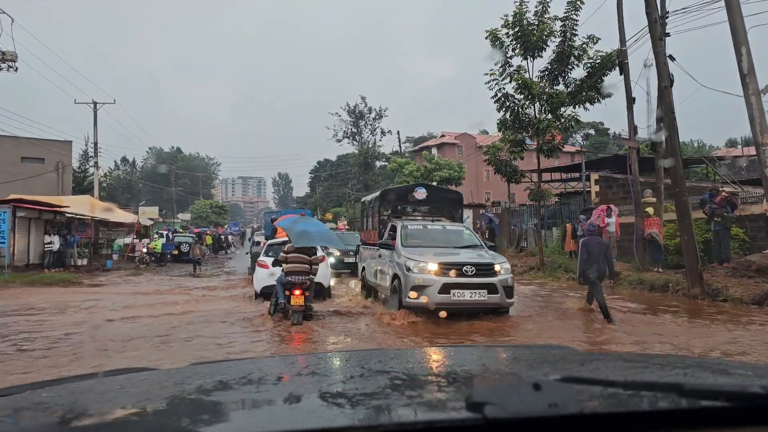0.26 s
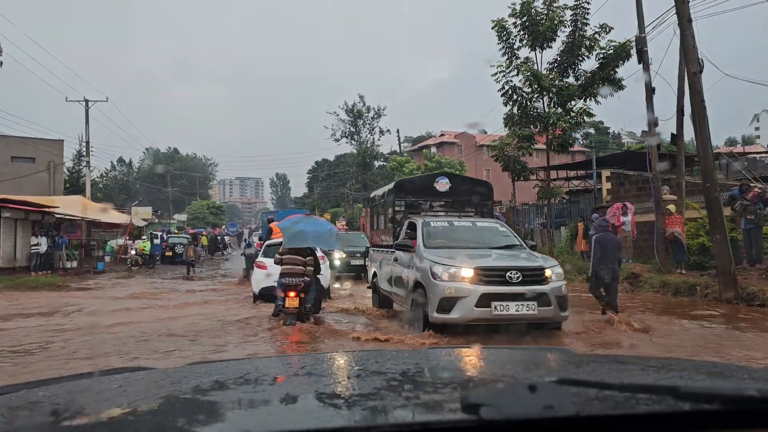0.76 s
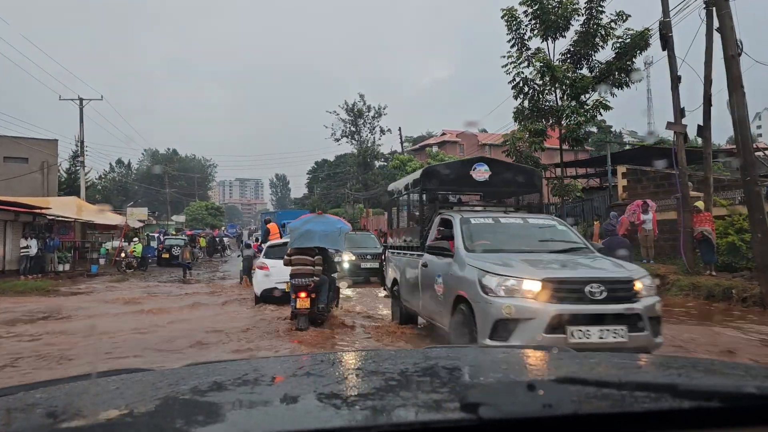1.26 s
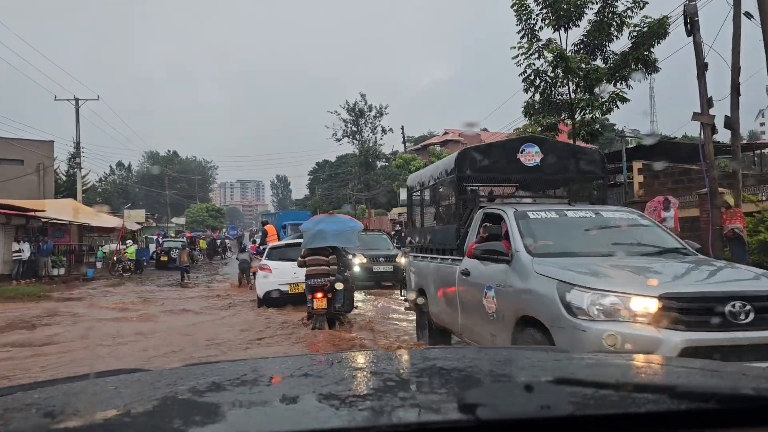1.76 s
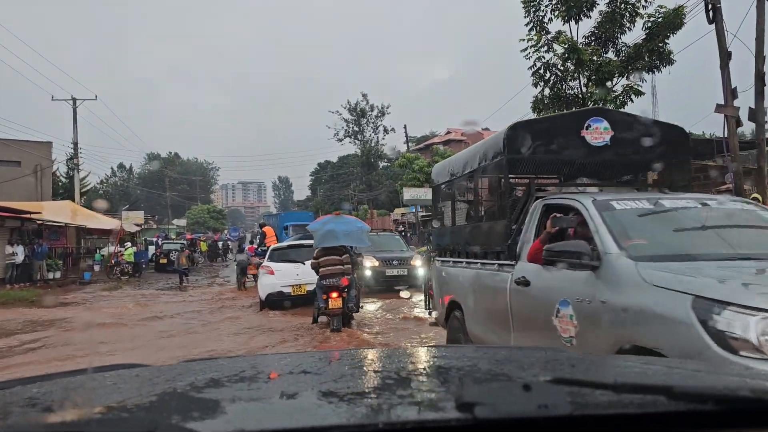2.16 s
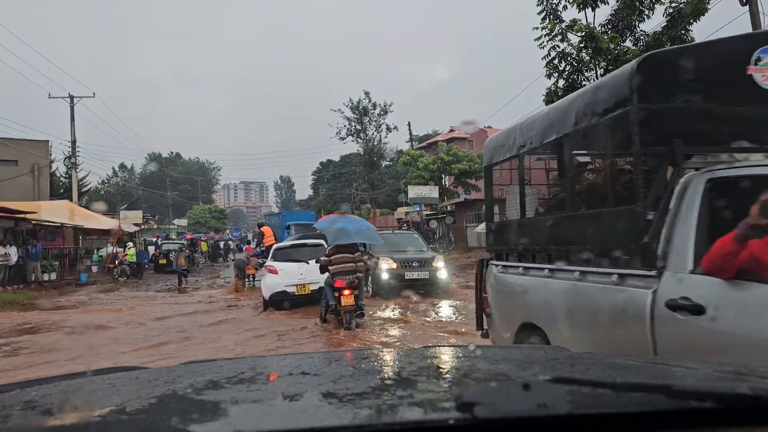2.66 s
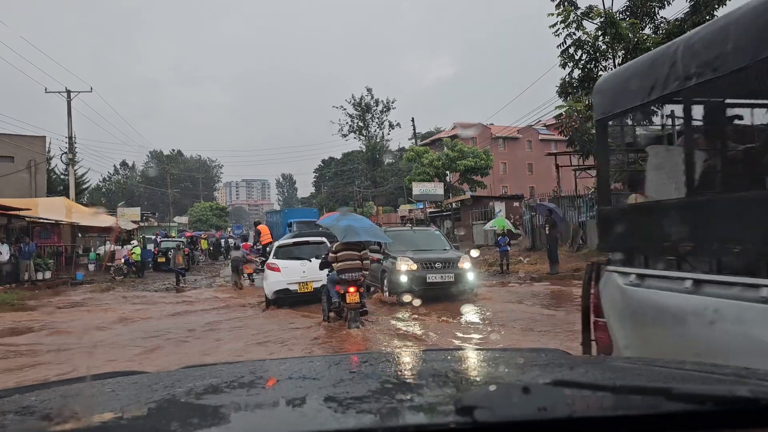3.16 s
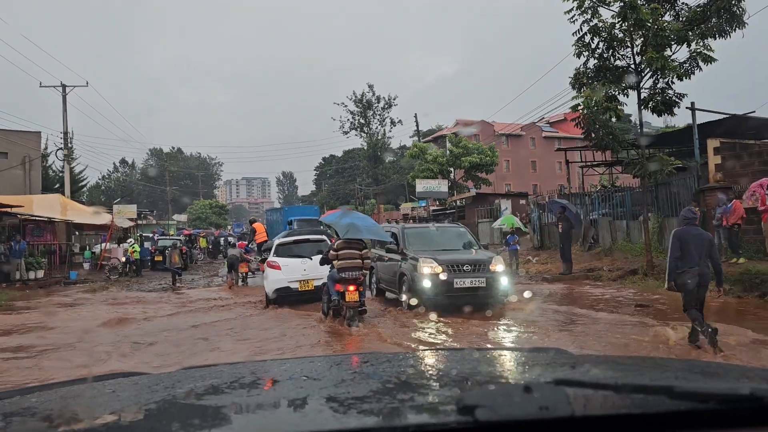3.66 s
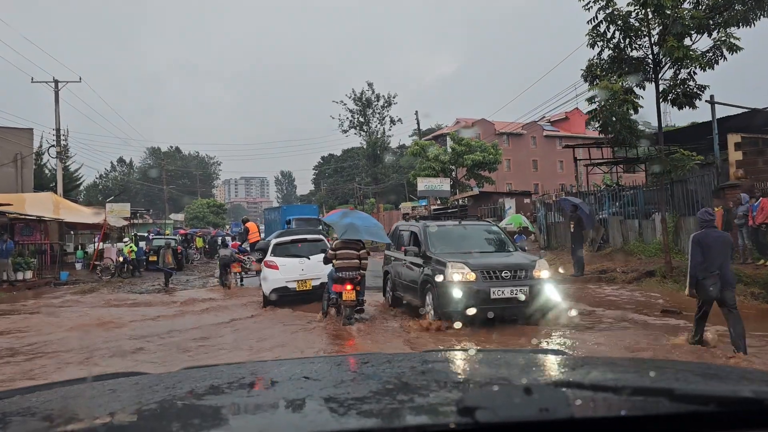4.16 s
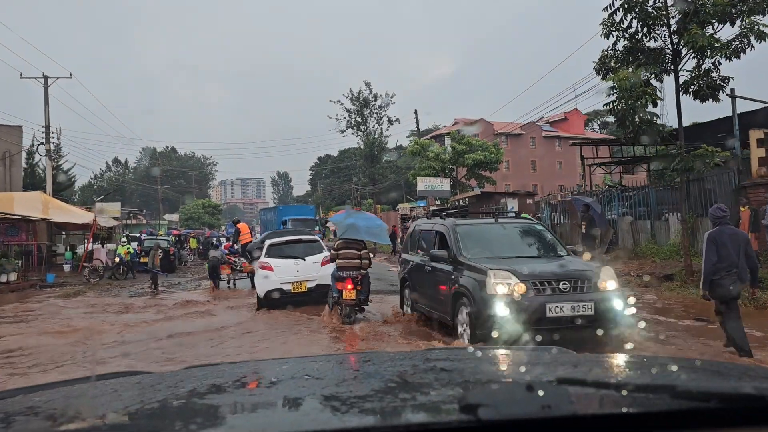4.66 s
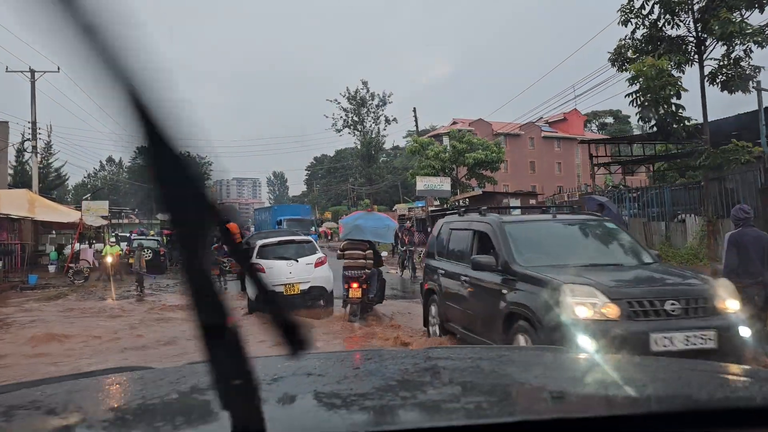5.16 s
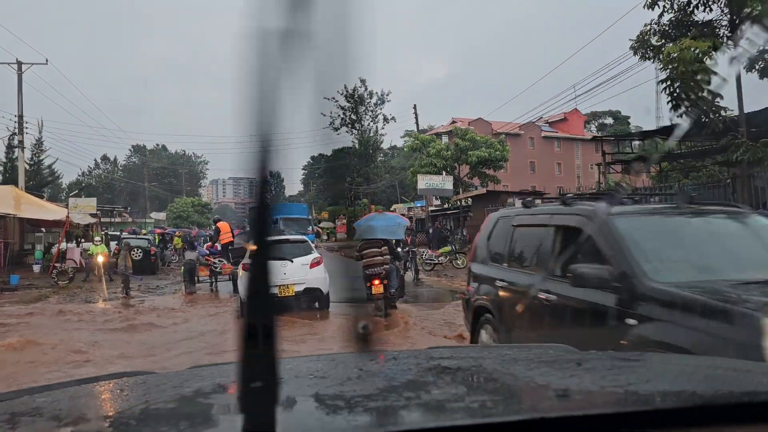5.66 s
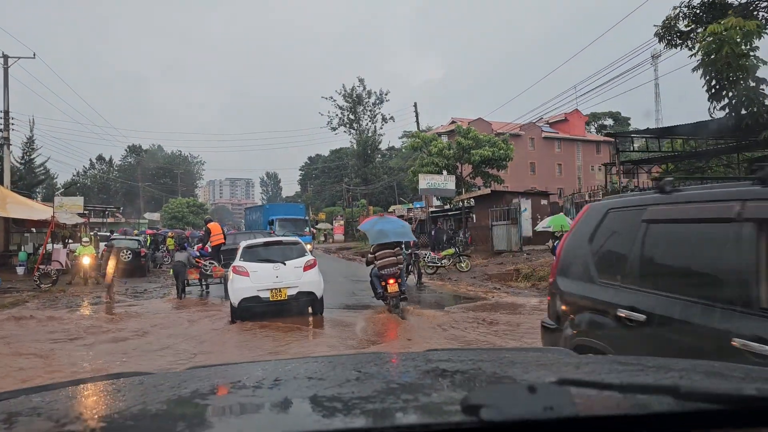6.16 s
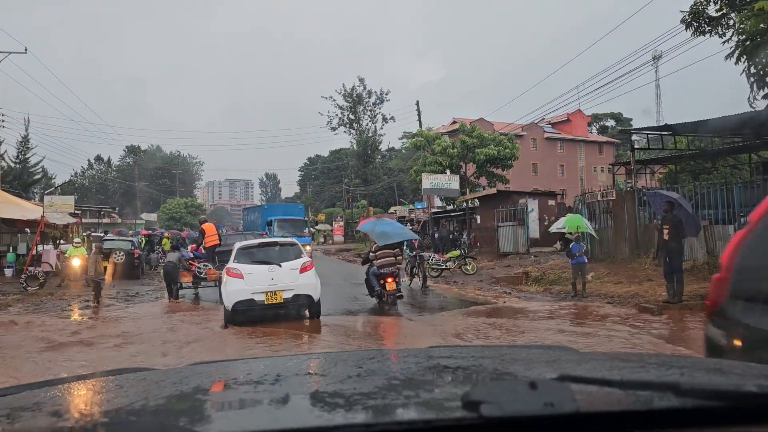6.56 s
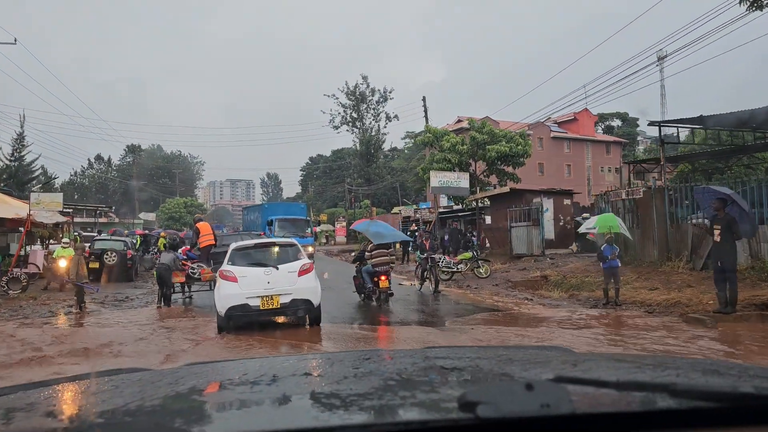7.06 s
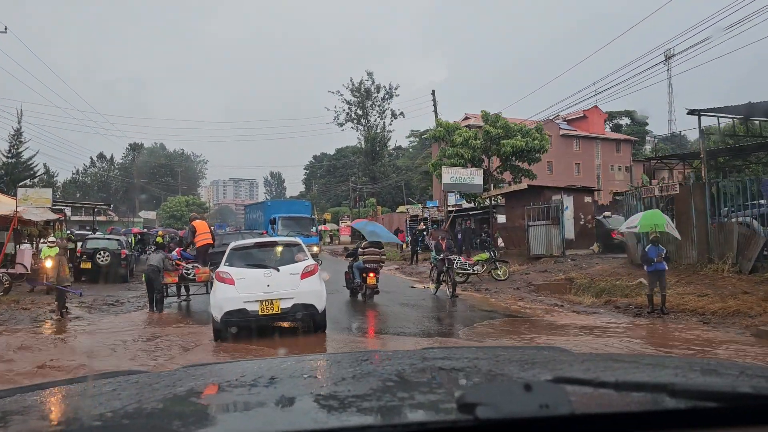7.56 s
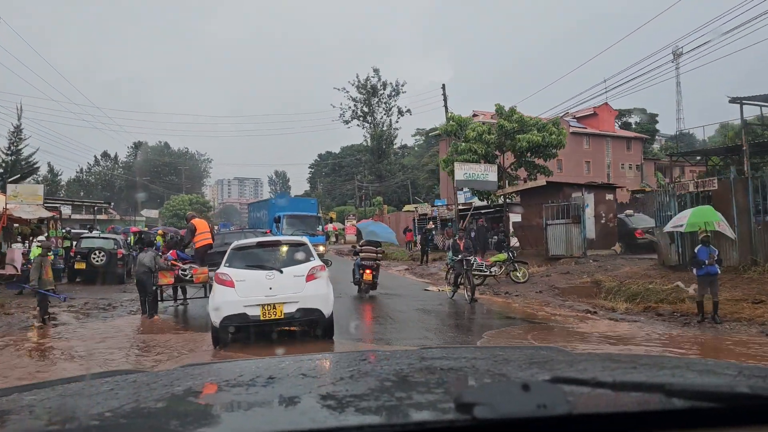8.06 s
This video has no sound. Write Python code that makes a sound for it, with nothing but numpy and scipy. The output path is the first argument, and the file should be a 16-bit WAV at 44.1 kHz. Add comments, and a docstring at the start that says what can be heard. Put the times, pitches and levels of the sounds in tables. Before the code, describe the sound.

From inside the cabin, a heavy car's engine idles with a deep boom and brief revs, over rumbling tyres and churning water. Fine drops tick on the glass at the right. Spray from two oncoming vehicles washes past, mostly on the right, around three and a half and again near seven seconds. Between them the wipers sweep once with dry knocks and a dull thud, then the engine revs hardest and settles.

```python
"""The engine of a heavy four-cylinder car booms in the cabin, idling and revving as it creeps through floodwater.
Firing orders make its note; shaped noise and ringing bubbles make the rumbling, churning wheels and watery swishes.
Droplet noise surges as spray, from the car's own wheels at first, then from two oncoming cars, over the drone of
vehicles ahead. Short rings tick on the glass as drops; the wipers make one sweep, with knocks and a thud made of
rings with rattle."""
import sys
import numpy as np
from scipy import signal
from scipy.fft import rfft, irfft, next_fast_len
from scipy.io import wavfile

SR = 44100
rng = np.random.default_rng(int(sys.argv[2]) if len(sys.argv) > 2 else 0)


def to_wav(sig):
    """Store sig (one row per channel, or 1-D mono) as 16-bit WAV at the path in sys.argv[1].

    Samples outside -1..1 are clipped; the rate is SR.
    """
    pcm = np.clip(np.atleast_2d(sig), -1, 1) * 32767
    pcm = np.round(pcm).astype(np.int16)
    wavfile.write(sys.argv[1], SR, pcm.T)  # frames by channels


N = 366823
TIME = np.arange(N) / SR

# how hard the car pushes through the water: time_s, push_db (below the hardest push)
PUSH = [(0, -8.5), (1.9, -6.5), (4.0, -7), (4.6, -4), (5.1, -3.5), (5.8, -4), (6.35, -3), (6.75, 0),
        (7.2, -1.5), (7.55, -4), (8.32, -5.5)]


def undb(db):
    """Decibels to gain."""
    return 10 ** (np.asarray(db) / 20)


def curves(table):
    """Each column of a table, joined by lines, for every sample."""
    s, *columns = np.transpose(table)
    return [np.interp(TIME, s, column) for column in columns]


def unit(x):
    """Scale to rms 1."""
    return x / np.sqrt(np.mean(x ** 2))


def pan(db):
    """Left and right gains for a level difference, left minus right."""
    return undb(np.array([[1], [-1]]) * db / 2)


def walk(rate):
    """Smooth random wander with a spread near 1, taking a new direction rate times a second."""
    knots = rng.standard_normal(1024)
    return 1.44 * np.interp(TIME * rate, np.arange(len(knots)), knots)


def bell(s, half):
    """A smooth rise and fall around a moment, down to 1/e at half seconds either side."""
    return np.exp(-((TIME - s) / half) ** 2)


def resonance(hz, modes):
    """Lift in dB that a set of resonances gives at a frequency."""
    return sum(db / (1 + (2 * (hz - centre) / width) ** 2) for centre, width, db in modes)


def colour(x, points, sides=None):
    """Shape a sound by a spectrum and by the resonances of glass and cabin, and lean it to one side."""
    # resonances of the glass and the cabin: centre_hz, width_hz, lift_db
    cabin = [(570.4, 9.2, 7.5), (784, 6.9, 7), (1156, 260, 3), (1351, 33, 8.5), (1562, 44, 5),
             (2074, 41, 6.5), (3055, 100, 5), (4770, 350, 0.5), (6340, 81, 5.5), (6870, 350, -2.5),
             (11700, 150, 5.5)]
    size = next_fast_len(N, True)
    f = np.fft.rfftfreq(size, 1 / SR)
    hz, db = np.transpose(points)
    spectrum_db = np.interp(np.log(f + 1), np.log(hz), db)
    gain = undb(spectrum_db + resonance(f, cabin))
    if sides is not None:
        gain = gain * pan(np.interp(f, *np.transpose(sides)))
    return irfft(rfft(x, size) * gain, size)[..., :N]


def spread(x, own):
    """From three unrelated sounds: the first reaches both sides, the others one side each."""
    own = np.clip(own, 0, 1)
    return np.sqrt(1 - own) * x[0] + np.sqrt(own) * x[1:]


def lift_level():
    """Dips in dB of the engine note while the driver eases off."""
    # moments of easing off: centre_s, depth_db, half_length_s
    lifts = [(0.42, -13, .1), (2.81, -9, .055), (2.96, -12, .04), (4.36, -4, .1), (4.84, -5, .06),
             (7.46, -12, .07)]
    return sum(db * bell(s, half) for s, db, half in lifts)


def engine(half_db=-25, half_db_per_octave=15, uneven_db=1.74):
    """Firings boom in the cabin; unequal cylinders add half orders, and each firing shakes out a dull clatter."""
    # engine speed: time_s, firing_hz
    speed = [(0.1, 32.76), (0.27, 38.2), (0.42, 47.67), (0.66, 46.86), (0.8, 39.34), (1.0, 37.84),
             (1.4, 35.01), (1.9, 33.19), (2.3, 34.56), (2.62, 34.35), (2.75, 39.16), (2.87, 46),
             (3.02, 35.05), (3.16, 31.94), (3.75, 33.28), (4.0, 37.07), (4.22, 38.59), (4.38, 53.22),
             (4.79, 50.15), (5.45, 49.89), (5.85, 38.3), (6.05, 48.5), (6.5, 50.06), (6.66, 62.24),
             (6.8, 69.05), (6.9, 71.1), (7.06, 67.6), (7.18, 62.2), (7.33, 50.98), (7.62, 36.21),
             (7.95, 33), (8.32, 32.98)]
    # firing note at the hardest push, most shaking at idle: firing_hz, level_db
    boom = [(33, -10.5), (36, -12.5), (38, -18), (42, -16), (51, -24), (70, -22)]
    # overtones: order (multiple of the firing rate), relative_db
    overtones = [(1.5,-11),(2,1.5),(2.5,-20),(3,-7),(3.5,-22),(4,-14),(4.5,-23),(5,-18),(6,-20),(7,-23),(8,-25)]
    # standing waves of the cabin air, with their nodes: centre_hz, width_hz, lift_db
    air_modes = [(76.3,8.4,8.5),(82.7,11.7,-5.5),(98.7,7.6,2.5),(106,5,-6),(113,7,3.5),(124,11,8.5),(141,8.6,3.5),(156,15,2),(179,14,-3),(196,14,8.5),(214,14,-8),(280,28,15),(572,50,16)]
    # spectrum of the clatter: frequency_hz, relative_db
    clatter_colour = [(60,3),(150,-0.5),(270,-6),(380,-17.5),(700,-14.5),(2000,-37),(8000,-76)]
    idle_hz = 34
    boom_growth = 0.91  # dB of firing note per dB of push
    # base levels at idle and the hardest push, growth per octave of speed, dB per dB of push
    overtone_db, overtone_db_per_octave, overtone_growth = -31.5, -4, 0.86
    clatter_db, clatter_db_per_octave, clatter_growth = -39.3, 1.5, 0.43
    waver_db, phase_scatter = 1.7, 0.06  # unsteadiness of the overtones, in level and in radians

    hz, = curves(speed)
    push_db, = curves(PUSH)
    octaves = np.log2(hz / idle_hz)
    boom_db = np.interp(hz, *np.transpose(boom)) + boom_growth * push_db
    load_db = overtone_db + overtone_db_per_octave * octaves + overtone_growth * push_db

    phase = 2 * np.pi * np.cumsum(hz * (1 + 0.0043 * walk(25))) / SR
    half_order = undb(half_db + half_db_per_octave * octaves) * np.sin(phase / 2)
    tone = undb(boom_db + uneven_db * walk(24)) * (np.sin(phase) + half_order)
    for order, db in overtones:
        # an overtone swells as it glides through a standing wave
        gain = undb(load_db + db + resonance(order * hz, air_modes) + waver_db * walk(14))
        # the higher ones are less steady
        jitter = phase_scatter * np.sqrt(order) * walk(24)
        tone = tone + gain * np.sin(order * phase + jitter + rng.uniform(0, 2 * np.pi))

    firing = (1 + np.cos(phase)) ** 3
    noise = spread(rng.standard_normal((3, N)), 0.13)
    clatter = unit(colour(firing * noise, clatter_colour))
    clatter_level = clatter_db + clatter_db_per_octave * octaves + clatter_growth * push_db
    return np.sqrt(2) * undb(lift_level()) * tone + undb(clatter_level) * clatter


def traffic(waver_db=1.0):
    """Only the exhaust note of the vehicles ahead gets into the cabin, fading as they draw away."""
    # level of the note: time_s, level_db
    drone = [(0, -20.5), (.27, -16.5), (.42, -25.5), (.6, -22), (1.9, -26.5), (2.6, -30.5), (2.85, -39),
             (3.8, -33.5), (4.4, -41), (8.32, -50)]
    drone_hz = 48.5
    db, = curves(drone)
    return np.sqrt(2) * undb(db + waver_db * walk(3.3)) * np.sin(2 * np.pi * drone_hz * TIME)


def spray_level():
    """Level in dB of the falling water: each surge builds to its crest and drains away over the steady hiss."""
    # surges of spray, from the car's own wheels at first, then from oncoming cars:
    # crest_s, level_db, rise_s, fall_s (both to 1/e of the power)
    surges = [(0.6, -52, 1, 0.41), (2.48, -48, 0.28, 0.41), (3.05, -44.5, 0.078, 0.36),
              (3.53, -41.5, 0.17, 0.72), (4.15, -50, 0.32, 0.23), (4.41, -44, 0.13, 0.043),
              (4.9, -48, 0.19, 0.25), (6.2, -50.5, 0.24, 0.47), (6.72, -41.5, 0.19, 0.56),
              (7.22, -51, 0.39, 0.19), (7.5, -41.5, 0.39, 0.36)]
    own_spray_db = -54.5  # steady hiss of the car's own wheels
    # all these levels stand ahead of the gain in spray()
    power = undb(own_spray_db) ** 2
    for s, db, rise, fall in surges:
        power = power + undb(db) ** 2 * np.exp(-np.abs(TIME - s) / np.where(TIME < s, rise, fall))
    return 10 * np.log10(power)


def bubbles(low_hz, high_hz, cycles, scatter_db, count):
    """Bubbles that ring for some cycles and rise in pitch, each starting between two frequencies."""
    out = np.zeros(N + SR)
    for when, pitch, size in rng.random((count, 3)):
        hz = low_hz * (high_hz / low_hz) ** pitch
        age = np.linspace(0, 1, int(cycles * SR / hz))  # share of its life
        decay = np.exp(-np.log(100) * age)
        ring = np.sin(2 * np.pi * cycles * age * (1 + 0.19 * age)) * decay
        start = int(when * N)
        out[start:start + len(age)] += undb(-scatter_db * np.log(0.042 + size)) * ring
    return unit(out[:N])


def wheels(bubble_db=-4):
    """Tyres rumble over the flooded road; water churns in the arches with the push and the surges of spray."""
    # spectrum of the tyre rumble: frequency_hz, relative_db
    road_colour = [(12,-29),(24,16),(42,15.5),(62,16),(90,6.5),(130,2.5),(175,-1),(260,-1.5),(370,-13),(600,-14.5),(1500,-52)]
    # spectrum of the churning water: frequency_hz, relative_db
    churn_colour = [(150,-39),(350,0),(480,-2.5),(760,3.5),(930,-0.5),(1400,-4),(1900,-6),(3000,-16),(8000,-51)]
    road_db, churn_db = -20.5, -39  # at the hardest push
    churn_growth = 2.15  # dB of churn per dB of push
    surge_db = -1  # churn that follows the spray, against spray_level()
    bump_db = 1.3  # the rumble throbs over the uneven road
    lift_share = 0.17  # part of each engine dip that the rumble follows

    push_db, = curves(PUSH)
    rumble = unit(colour(spread(rng.standard_normal((3, N)), 0.023), road_colour))
    rumble_db = road_db + push_db + lift_share * lift_level() + bump_db * walk(8)

    gurgle = np.array([bubbles(307.6, 2160, 10.0, 2.1, count=1500) for _ in range(3)])
    water = rng.standard_normal((3, N)) * undb(1.3 * walk(14.0)) + undb(bubble_db) * gurgle
    churn = unit(colour(spread(water, 0.29), churn_colour))
    stir = np.hypot(undb(churn_db + churn_growth * push_db), undb(surge_db + spray_level()))
    return undb(rumble_db) * rumble + stir * churn


def spray(gain_db=2.0, droplet_db=-3, splash_db=0.97, brighten=0.38):
    """Thrown water falls back as countless droplets, in uneven splashes; the louder it is, the brighter."""
    # spectrum of the spray: frequency_hz, relative_db
    spray_colour = [(400, 6.5), (900, -1), (1400, 3.5), (2000, 1.5), (2600, -0.5), (4700, -0.5), (8150, -3),
                    (8500, -10), (10300, -13.5), (16000, -14.5)]
    # the spray is mostly on the right: frequency_hz, left_minus_right_db
    spray_side = [(500,-2),(1000,-4.5),(2000,-1),(4200,-5.5),(8000,-3),(14000,-1.5)]

    level_db = spray_level()
    landing = rng.random((3, N)) < 2500 / SR  # about 2500 droplets a second
    size_db = 2.05 * np.minimum(rng.exponential(size=(3, N)), 4)
    droplets = landing * rng.standard_normal((3, N)) * undb(size_db)
    water = spread(rng.standard_normal((3, N)) + undb(droplet_db) * unit(droplets), 0.79)
    water = unit(colour(water, spray_colour, spray_side))

    low_pass = signal.butter(2, 3500, fs=SR, output="sos")
    rush = signal.sosfiltfilt(low_pass, water)
    fizz_db = brighten * (level_db - level_db.mean()) + splash_db * walk(35)
    fizz = (water - rush) * undb(fizz_db)
    return (rush * undb(0.62 * walk(30)) + fizz) * undb(level_db + gain_db + 0.5 * walk(45))


def swells():
    """Low booms swell and die, from the engine, the drone, the body and the wiper thud."""
    # booms: centre_s, level_db, pitch_hz, half_length_s
    booms = [(0.217, -17.5, 49.4, 0.07), (0.627, -19, 46.7, 0.11), (0.898, -21.5, 48.8, 0.39),
             (4.181, -16.5, 44.6, 0.031), (4.517, -20, 41.3, 0.099), (5.153, -23.5, 48, 0.091),
             (5.6, -20, 45.8, 0.11), (5.865, -24.5, 79, 0.053), (5.969, -23.5, 35.67, 0.16),
             (6.233, -12, 46.1, 0.063), (6.697, -17, 58.3, 0.048), (7.382, -12, 34.03, 0.031),
             (7.54, -19, 46.6, 0.064), (7.98, -23, 50.12, 0.076)]
    out = np.zeros(N)
    for s, db, hz, half in booms:
        tone = np.sin(2 * np.pi * (hz * (TIME - s) + rng.random()))
        out += undb(db) * bell(s, half) * tone
    return np.sqrt(2) * out


def drops(gain_db=1.6):
    """Single drops and a random drizzle tick on the glass, each with a slightly different ring."""
    # single drops at set times, most of them louder than the drizzle:
    # start_s, peak_db (ahead of gain and pan)
    single = [(0.3475, -35.5), (0.4643, -41), (0.9248, -41), (1.1394, -44), (1.1662, -44), (1.3878, -40),
              (1.475, -38), (1.5357, -41), (1.5908, -43), (1.7383, -36.5), (1.8257, -34), (2.006, -38),
              (2.156, -32.5), (2.1874, -39), (2.267, -35), (2.356, -36), (2.4411, -36), (2.587, -35),
              (2.7028, -38), (2.7791, -43), (5.6821, -37), (5.7618, -40), (7.6816, -30.5), (7.8033, -31),
              (7.9229, -31.5), (8.0403, -30), (8.073, -37), (8.1653, -38), (8.1991, -33)]
    # ring of a drop ahead of detuning: pitch_hz, relative_db, t60_s
    tick = [(4700,10,0.002),(6460,5.5,0.003),(7700,2,0.0047),(11400,1,0.0024),(15100,2,0.00089)]
    drizzle_per_s, drizzle_db, drizzle_scatter_db = 3, -45, 3  # levels ahead of gain and pan
    pan_db = -17.5  # left minus right

    out = np.zeros((2, N + SR))
    age = np.arange(SR // 100) / SR
    drizzle = []
    for when, size in rng.random((int(drizzle_per_s * N / SR), 2)):
        drizzle.append((when * N / SR, drizzle_db + drizzle_scatter_db * (2 * size - 1)))

    # the ticks hold little below this corner
    high_pass = signal.butter(4, 4000, "high", fs=SR, output="sos")
    for s, db in list(single) + drizzle:
        detune = 1 + 0.052 * rng.standard_normal(len(tick))
        ring = np.zeros(len(age))
        for k, (hz, mode_db, t60) in enumerate(tick):
            mode = undb(mode_db - 60 * age / t60) * np.sin(2 * np.pi * hz * detune[k] * age)
            ring += (-1) ** k * mode
        ring = signal.sosfilt(high_pass, ring)
        start = int(s * SR)
        out[:, start:start + len(age)] += undb(db + gain_db) * pan(pan_db) * ring / np.abs(ring).max()
    return out[:, :N]


def swishes(lump_db=3.0):
    """Watery swishes and gurgles, some of them as the wipers sweep: lumpy, hollow crowds of ringing bubbles."""
    # swishes: centre_s, level_db, half_length_s
    moments = [(0.38, -47, 0.11), (4.384, -41, 0.06), (4.76, -41, 0.076), (4.992, -50, 0.065),
               (5.25, -43, 0.18), (5.48, -44, 0.08), (6.868, -39, 0.061)]
    # spectrum of the water: frequency_hz, relative_db
    swish_colour = [(150, -22), (330, -7), (520, -1), (740, -5), (950, -21), (2000, -27), (8000, -60)]
    water = np.array([bubbles(325, 1050, 13, 3.5, count=1200) for _ in range(3)])
    gurgle = unit(colour(spread(water, 0.53), swish_colour))
    swell = sum(undb(db) * bell(s, half) for s, db, half in moments)
    return swell * undb(lump_db * walk(40)) * gurgle


def blows(table, points, own, gain_db):
    """Each blow rings one main panel mode and sets many lesser ones rattling."""
    attack_s = 0.0005
    snap_gain, snap_s = 0.55, 0.003  # the rattle starts with a snap, this much stronger
    rattle = unit(colour(spread(rng.standard_normal((3, N)), own), points))
    out = np.zeros((2, N))
    age = np.arange(SR // 3) / SR
    snap = 1 + snap_gain * np.exp(-age / snap_s)
    for s, rattle_db, ring_db, hz, t60 in table:
        span = int(s * SR) + np.arange(len(age))
        envelope = undb(gain_db - 60 * age / t60) * (1 - np.exp(-age / attack_s))
        ring = undb(ring_db) * np.sin(2 * np.pi * hz * age)
        out[:, span] += envelope * (undb(rattle_db) * snap * rattle[:, span] + ring)
    return out


def wiper_knocks():
    """The sweeping wipers knock: short panel rings with a rattle that differs between the sides."""
    # knocks: start_s, rattle_db, ring_db (both ahead of the gain), ring_hz, t60_s
    knocks = [(5.529,-23,-37,2300,.04),(5.538,-26,-39,1400,.05),(5.578,-23,-33,1950,.05),(5.848,-26.5,-36,1450,.06),(5.863,-25,-31,1900,.05),(6.229,-30,-36,1900,.05),(6.266,-27,-37,800,.045)]
    # spectrum of the rattle: frequency_hz, relative_db
    knock_colour = [(150,12),(500,16),(900,5),(1400,4),(2100,-5),(2700,-4.5),(3800,-9),(6000,-28),(12000,-42)]
    return blows(knocks, knock_colour, own=0.5, gain_db=-3)


def wiper_thuds():
    """The sweep thuds through the body: lower, mostly longer rings with a rattle mostly shared by both sides."""
    # thuds: start_s, rattle_db, ring_db (both ahead of the gain), ring_hz, t60_s
    thuds = [(5.697,-33,-30,270,.07),(5.706,-28,-23,318,.11),(5.724,-29,-28,325,.09),(5.736,-27,-15,123,.11),(5.743,-31,-27,300,.08),(5.755,-25,-27,500,.05),(5.756,-36,-21,92,.09),(5.768,-35,-32,390,.05)]
    # spectrum of the rattle: frequency_hz, relative_db
    thud_colour = [(40,2),(80,15),(120,2),(200,-1),(320,0),(430,-9),(700,-9),(1400,-21),(2200,-34),(4000,-40),(10000,-60)]
    return blows(thuds, thud_colour, own=0.12, gain_db=2)


def scene():
    """Engine, water and wipers as heard from behind the windscreen."""
    car = engine() + swells() + wheels()
    water = spray() + drops() + swishes()
    return car + traffic() + water + wiper_knocks() + wiper_thuds()


def record(dry):
    """Sound reaches the left microphone slightly later; the top is cut."""
    lag = 19  # samples
    top_hz = 15800
    ports = np.array([np.pad(dry[0], (lag, 0))[:N], dry[1]])
    return signal.sosfilt(signal.ellip(10, 0.2, 80, top_hz, fs=SR, output="sos"), ports)


dry = scene()
out = record(dry)
to_wav(out)
```